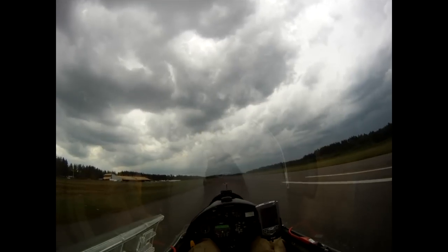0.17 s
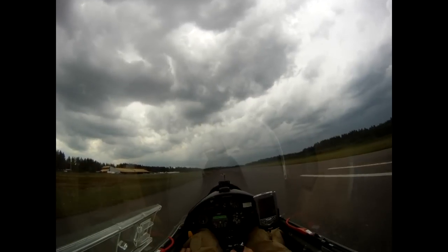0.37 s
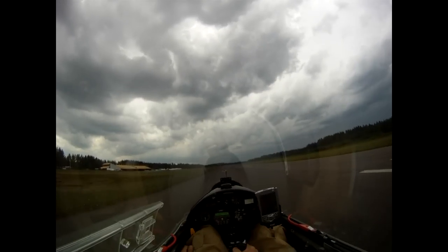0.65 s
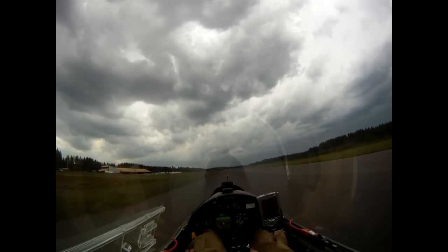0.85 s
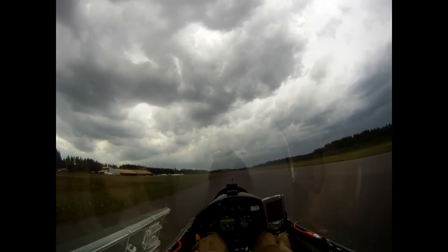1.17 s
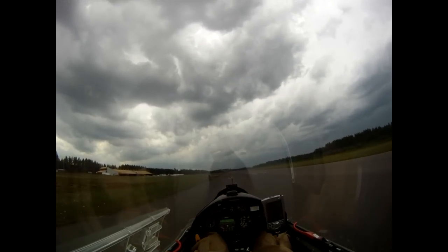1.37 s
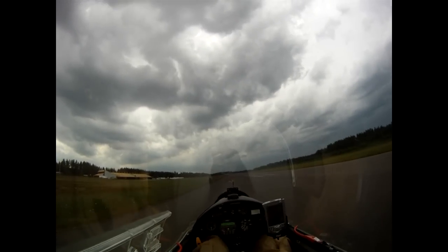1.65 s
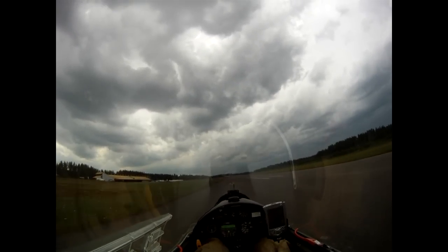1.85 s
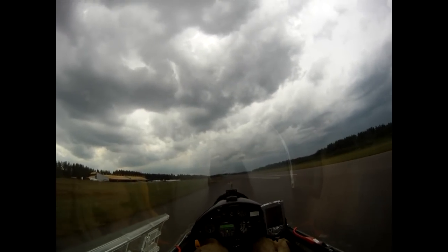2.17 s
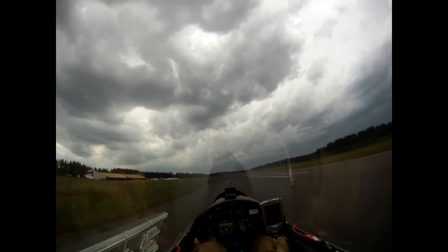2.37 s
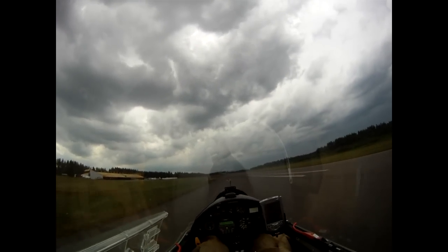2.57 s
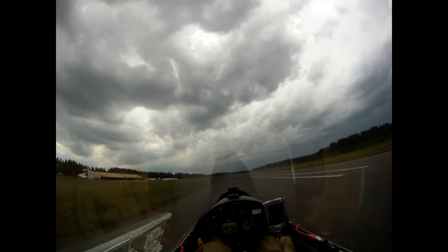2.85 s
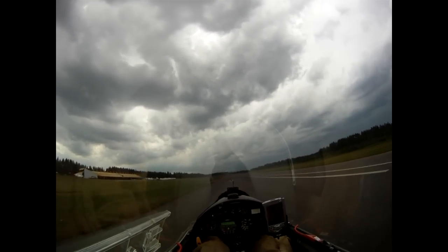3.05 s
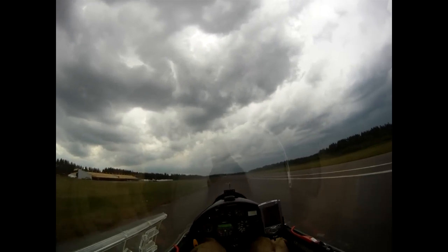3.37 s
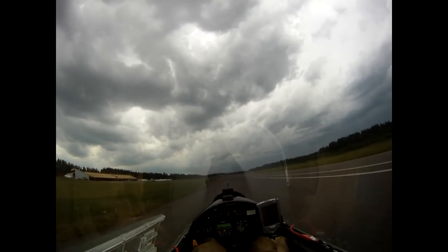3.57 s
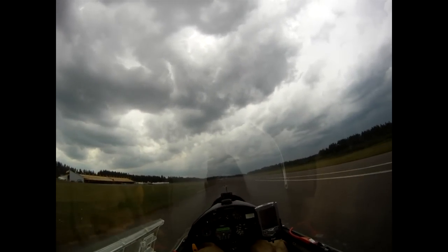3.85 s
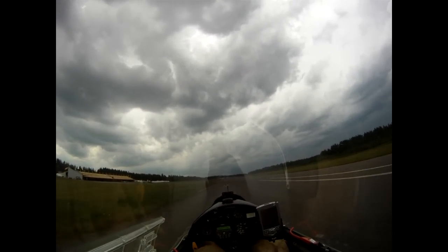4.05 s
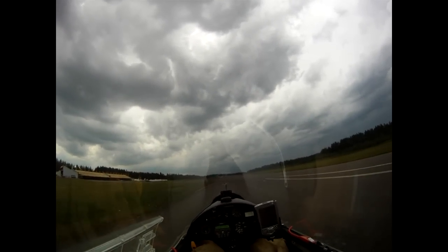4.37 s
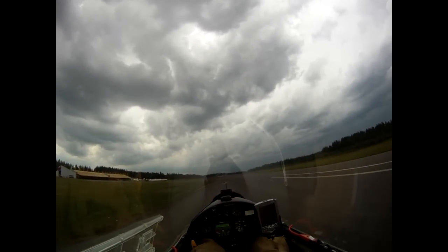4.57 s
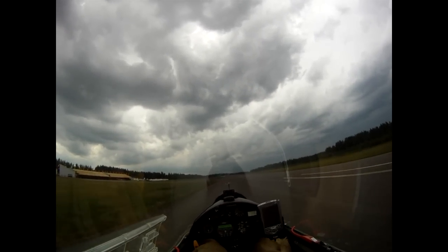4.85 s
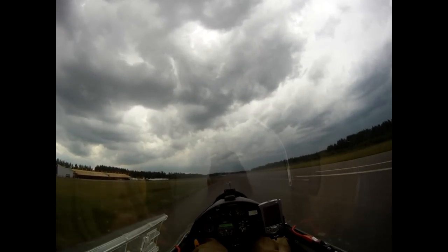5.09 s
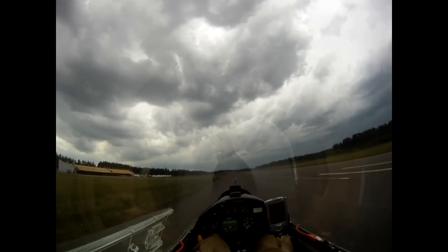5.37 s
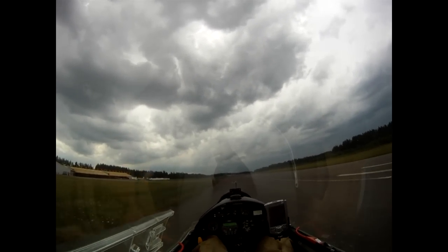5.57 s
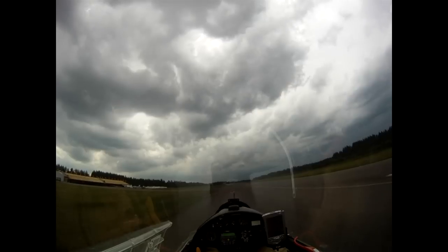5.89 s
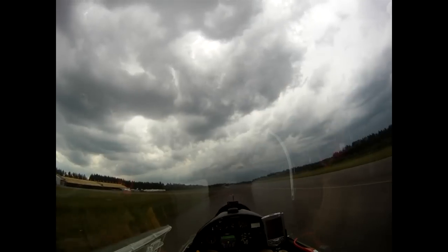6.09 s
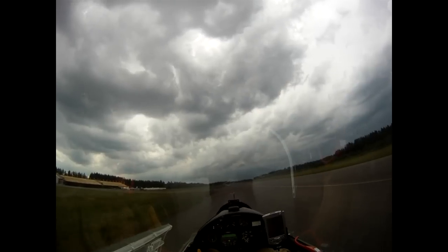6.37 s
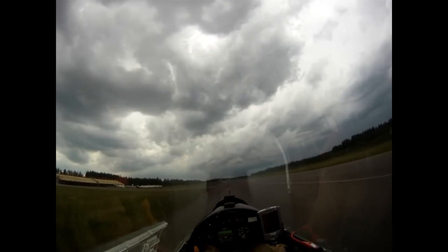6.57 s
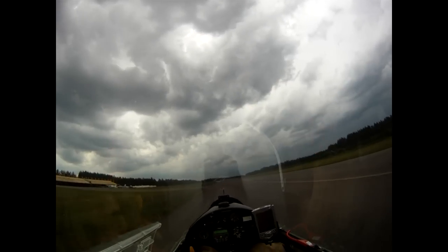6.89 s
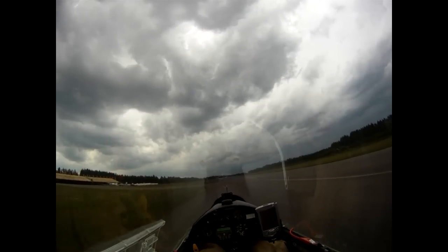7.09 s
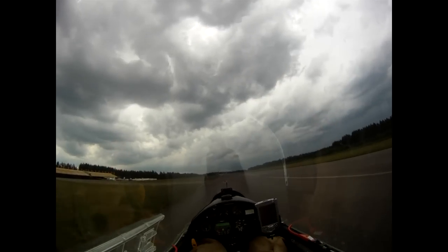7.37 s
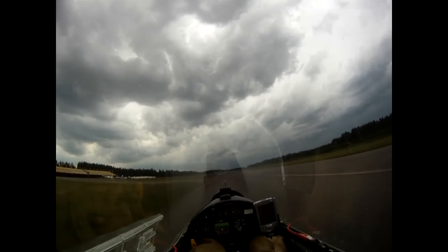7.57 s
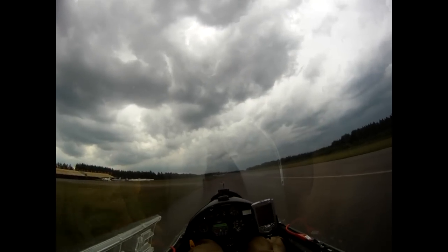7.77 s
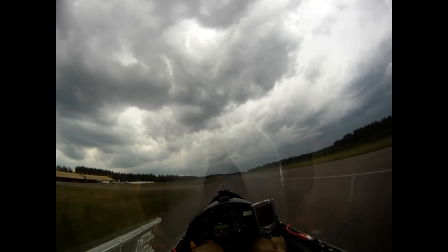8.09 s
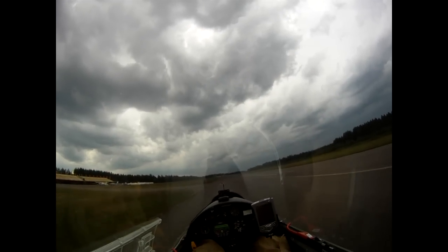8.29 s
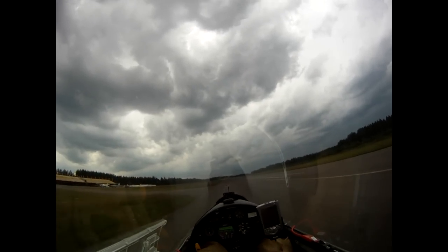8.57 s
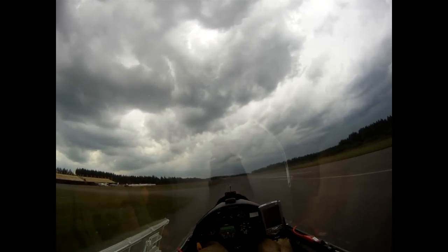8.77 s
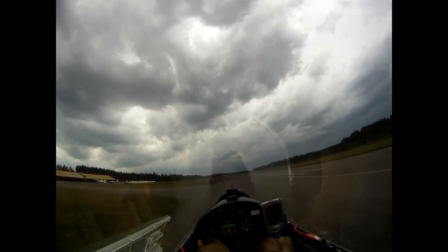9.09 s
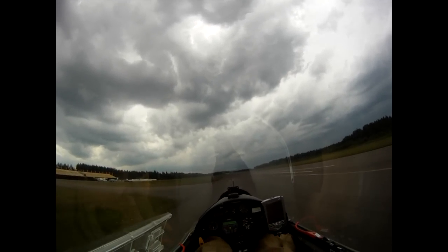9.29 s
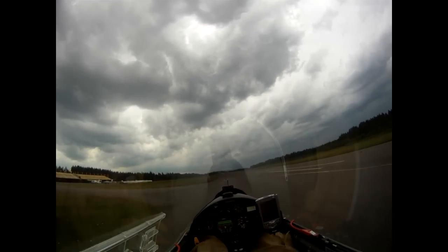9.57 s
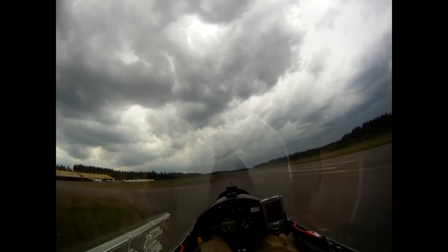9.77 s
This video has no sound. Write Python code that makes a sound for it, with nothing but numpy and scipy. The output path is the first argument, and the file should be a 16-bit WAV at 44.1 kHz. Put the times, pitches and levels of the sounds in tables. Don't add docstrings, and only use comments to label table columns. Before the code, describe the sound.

Low throbbing hum and roar of a glider rolling along a runway, wind hiss, clattering bursts of cabin rattles, and small metallic buckle chinks.

```python
import sys
import numpy as np
from scipy import signal
from scipy.fft import rfft, irfft, next_fast_len
from scipy.io import wavfile
from scipy.ndimage import uniform_filter1d, map_coordinates

SR = 44100
rng = np.random.default_rng(int(sys.argv[2]) if len(sys.argv) > 2 else 0)


def wav_out(sig):
    wavfile.write(sys.argv[1], SR, np.round(np.clip(np.atleast_2d(sig).T, -1, 1) * 32767).astype(np.int16))


def gain_from_decibels(decibels):
    exponent = np.asarray(decibels, float) / 20
    return 10 ** exponent


N = 438354

# order [multiple of the turn rate], level/dB
TYRE_HARMONICS = [
    [(2, 4), (3, 4), (4, -4)],
    [(5, 0.5)],
    [(6, -1), (7, -6), (8, -4.5), (9, -2.5), (10, -0.5), (12, -3.5)],
]
# level/dB at full speed, growth [dB per dB of speed], gain under drag/dB
TYRE_FORCING = [
    (-51, .1, 10),
    (-32.5, 2, 0),
    (-47, 0.19, 6),
]
# f/Hz, bandwidth/Hz, level/dB
HULL_BOOM = [(28.4, 11, -9.5), (59.6, 22, -5.5), (100, 26, -1), (137.5, 22.8, -3), (174.8, 30.7, -5)]
# f/Hz, bandwidth/Hz, level/dB
HULL_DRONE = [(222.7, 25.4, -6), (295.7, 20.7, 1.5)]
# f/Hz, bandwidth/Hz, level/dB
HULL_SHELL = [(350.3, 13, -5.5), (431.8, 44.3, -3), (521.4, 59, -3), (604.7, 56.5, -1.5), (694, 37, -1.5),
              (805, 130, -9)]
# level/dB at full speed, growth [dB per dB of speed], swell depth/dB
ROAD_FORCING = [
    (-29.5, -.3, 0.4),
    (-29.5, -0.019, 1),
    (-37, 0.34, 0.23),
]
# f/Hz, level/dB
AIR_SPECTRUM = [(530, -21), (900, -3.5), (1080, -7.5), (1210, -6.5), (1490, -14), (2160, -13), (2600, -20),
                (2980, -14.5), (3540, -24), (5200, -32), (5900, -38), (7670, -74), (13000, -120)]
# t/s, level/dB
AIRFRAME_SHAKE = [(0.0, -60), (0.52, -64.5), (1.57, -62.5), (1.71, -63), (2.05, -61.5), (3.1, -61),
                  (3.43, -62.5), (4.07, -62), (4.54, -64), (5.42, -60), (5.76, -65), (6.23, -60.5),
                  (7.94, -64), (8.72, -59.5), (9.0, -63.5), (9.94, -60)]
# t/s, peak level/dB, hardness [0-1], weight/dB
JUDDER_KNOCKS = [(2.2473, -43, .15, 9), (2.385, -36.5, 0.4, 9), (2.4284, -37, 0.5, 6.5),
                 (2.5007, -45, 0.3, 14), (2.5262, -48.5, .25, 9), (2.5391, -35, .5, 5.5),
                 (2.5934, -47.5, 0.3, 7), (2.6256, -34.5, 0.3, 7), (2.7062, -46.5, .05, 19.5),
                 (2.7427, -33, .55, 3), (2.8449, -41, .35, 7), (2.8918, -41.5, .4, 9),
                 (2.9612, -42, 0.8, -4), (2.9921, -33.5, .4, -2), (3.036, -42, 0.2, 9),
                 (3.0726, -37, .4, 7), (3.0989, -42, 0.4, 7), (3.1123, -53, 0.3, -2),
                 (3.1427, -39, 0.4, 11), (3.2044, -35.5, .4, 6.5), (3.35, -44.5, 0.1, 11),
                 (3.7953, -44, .15, 16.5), (3.933, -40, .55, 11), (3.9466, -42.5, .75, -8),
                 (3.9913, -43.5, 0.6, 10.5), (4.041, -31, 0.6, 4), (4.1056, -37.5, .4, 5.5),
                 (4.1894, -34, 0.5, 4), (4.2773, -44.5, .35, 11.5), (4.3066, -37.5, .48, 11.5)]
# t/s, peak level/dB, hardness [-0.1 to 1], weight/dB
BUMP_KNOCKS = [(.0164, -51, 0.4, 18), (.177, -46, 0.3, 17), (.4438, -52, 0.1, 24.5), (.621, -41, .2, 15),
               (.8895, -39.5, .2, 13), (1.0874, -43, 0.6, 8.5), (1.1379, -45.5, 0.4, 20.5),
               (1.5249, -51.5, 0.2, 17), (1.6043, -51, .15, 13), (1.701, -46.5, 0.2, -7),
               (1.8093, -45, .55, 16), (1.8367, -51.5, -.1, 8), (1.8921, -47, -.1, 12.5),
               (1.9328, -40, 0.2, 6.5), (5.216, -46, 0.2, 16), (5.3986, -34.5, .48, 5),
               (6.1933, -42.5, 0.7, -9), (6.2696, -46.5, 0.4, 15.5), (6.4587, -42, 0.9, 0),
               (6.569, -43.5, .6, 11.5), (7.1866, -43.5, .15, 11), (7.2699, -37.5, 0.5, 1),
               (8.1224, -38.5, 0.21, 11), (8.3365, -43.5, 0.4, 16), (8.4342, -38, 0.7, 8),
               (8.7994, -38.5, 0.8, 3), (8.8498, -54, 0.1, 18), (8.9531, -45.5, 0.5, 10),
               (9.6178, -48, 0.8, 11), (9.6954, -44.5, 1, -5.5)]
# t/s, peak level/dB
PANEL_TAPS = [(.3123, -55), (.364, -56), (.915, -44.5), (1.9058, -47.5), (1.96, -45), (2.553, -43),
              (2.815, -58), (3.2504, -49), (3.272, -49.5), (3.5492, -47.5), (3.579, -55.5), (3.6177, -56.5),
              (3.6868, -51.5), (3.8763, -49.5), (4.35, -52), (4.944, -64), (5.3077, -50.5), (5.72, -53.5),
              (6.3279, -51), (6.983, -48.5), (1.225, -49.5), (1.44, -55.5), (8.145, -48), (7.1242, -54.5),
              (8.9314, -49.5), (9.184, -52), (9.338, -50.5)]
# level over its ring/dB, hardness [0-1], weight/dB
BUCKLE_BLOW = (3.3, 0.82, -2)
# f/Hz, bandwidth/Hz, level/dB
HULL_THUMP = [(562, 79, 2), (678, 174, -4.5)]
# f/Hz, bandwidth/Hz, level/dB
PANEL_MODES = [(950, 470, -4), (1267, 160, 5), (1580, 710, -11)]
# f/Hz, bandwidth/Hz, level/dB
FITTING_MODES = [(1770, 600, -7), (2250, 320, -2.5), (2500, 230, -1), (2820, 260, -0.5), (3270, 650, -8)]
# f/Hz, bandwidth/Hz, level/dB
BRIGHT_MODES = [(3820, 260, 1.5), (4170, 520, -5.5), (5100, 500, -13.5)]
# t/s, peak level/dB
TRIM_TICKS = [(.8071, -65), (.8659, -66), (1.5738, -57.5), (1.6322, -56), (1.9096, -54), (1.955, -59.5),
              (2.3241, -63.5), (2.4658, -64), (2.7282, -57.5), (4.4842, -61.5), (4.9162, -62.5),
              (5.037, -68), (5.3088, -62), (5.435, -49.5), (5.9614, -63), (6.205, -58), (5.81, -64),
              (6.7241, -59.5), (6.9506, -59.5), (7.1242, -61.5), (7.434, -63), (8.5834, -59), (9.3357, -61),
              (9.4674, -61), (9.7672, -64)]
# t/s, peak level/dB
BUCKLE_CHINKS = [(5.4759, -41.5), (5.5073, -49), (7.5042, -44.5), (7.5606, -42.5), (7.6929, -50),
                 (7.7298, -50.5), (7.8455, -47), (7.9767, -40.5), (8.029, -45), (8.3025, -50)]
# f/Hz, level/dB, time to decay by 85 dB/s
BUCKLE_MODES = [(2270, 1.5, 0.19), (2150, -11, .12), (2650, -10.5, 0.14), (2990, -0.5, 0.29),
                (2880, -8, 0.34), (3440, -11, 0.15), (4130, -12, 0.39), (4510, -9.5, .08)]
# t/s, length/s, level/dB, brightness [0-1]
STRAP_STROKES = [
    (6.05, .1, -65, .7),
    (6.1, .065, -63, .1),
    (6.14, .07, -64.5, .9),
    (8.691, .09, -66, .4),
]
# f/Hz, bandwidth/Hz, level/dB
STRAP_MODES = [(1600, 900, -5.5), (2430, 830, -6.5), (3600, 270, 4.5), (4280, 660, -6), (5070, 450, -4.5)]

COAST_HZ, BRAKE_S, SLOWING_HZ_PER_S = 14.85, 1.8, 1.125
DRAG_ON_S, DRAG_OFF_S, DRAG_FADE_S = 2.1, 6.9, .3
AIR_DB = 2.5
CHATTER_DB, CHATTER_GROWS = -47, .8
TAP_HARDNESS, TAP_WEIGHT_DB = 0.22, 10
KNOCK_T60_S, PANEL_DB, PANEL_LOSS_DB, BRIGHT_DB, BRIGHT_GAIN_DB = 0.085, 16.5, 21, -16, 14
SNAP_DB, SNAP_GAIN_DB = -35.5, 14.5
FAINT_TICK_DB, FAINT_SPREAD_DB = -71, 7
SETTLE_DB, SETTLE_S = 3, 0.028
CLOSE_S = .004


def unit(x):
    return x / np.sqrt(np.mean(x ** 2) + 1e-20)


def curves(rows):
    s, *cols = np.transpose(rows)
    return [np.interp(np.arange(N) / SR, s, c) for c in cols]


def wobble(rate):
    knots = rng.standard_normal(int(N * rate / SR) + 4)
    return map_coordinates(knots, [np.arange(N) * rate / SR])


def filtered(x, response):
    m = next_fast_len(len(x) + 8192)
    return irfft(rfft(x, m) * response(np.fft.rfftfreq(m, 1 / SR)), m)[:len(x)]


def modes(table, top_hz, order):
    def response(f):
        total = 0
        for k, (centre, width, db) in enumerate(table):
            resonance = 1j * f * width / (centre * centre - f * f + 1j * f * width)
            total = total + (-1) ** k * gain_from_decibels(db) * resonance
        return total / (1 + 1j * f / top_hz) ** order
    return response


def patchy(depth_db):
    z = signal.stft(rng.standard_normal(N), nperseg=512)[2]
    field = uniform_filter1d(rng.standard_normal(z.shape), size=6, axis=0)
    field = uniform_filter1d(field, size=8, axis=1)
    return signal.istft(z * gain_from_decibels(depth_db * unit(field)), nperseg=512)[1][:N]


def wheel():
    return COAST_HZ - SLOWING_HZ_PER_S * np.maximum(np.arange(N) / SR - BRAKE_S, 0)


def speed_db():
    return 20 * np.log10(wheel() / COAST_HZ)


def tyre():
    t = np.arange(N) / SR
    angle = 2 * np.pi * np.cumsum(wheel()) / SR
    drag = (np.tanh((t - DRAG_ON_S) / DRAG_FADE_S) - np.tanh((t - DRAG_OFF_S) / DRAG_FADE_S)) / 2
    wavers_db = (1.5, .4, 2.5)
    out = np.zeros(N)
    for (level_db, grows, drag_db), pattern, waver_db in zip(TYRE_FORCING, TYRE_HARMONICS, wavers_db):
        level = gain_from_decibels(level_db + 2 + grows * speed_db() + drag_db * drag)
        for k, db in pattern:
            out += level * gain_from_decibels(db + waver_db * wobble(4.0)) * np.sin(k * angle + k * k)
    return out


def roar(bumps):
    out = np.zeros(N)
    bodies = (HULL_BOOM, HULL_DRONE, HULL_SHELL)
    for (level_db, grows, swell_db), body, bump_db in zip(ROAD_FORCING, bodies, (.8, .9, 1.8)):
        ring = filtered(rng.standard_normal(N), modes(body, 590, order=6))
        swell = gain_from_decibels(bump_db * bumps + 0.92 * wobble(30) + swell_db * wobble(7))
        out += gain_from_decibels(level_db + grows * speed_db()) * unit(swell * ring)
    return out


def air(bumps):
    hz, db = np.transpose(AIR_SPECTRUM)
    grit = gain_from_decibels(0.96 * bumps + 1.8 * wobble(60) + 1.9 * wobble(300))

    def colour(f):
        return gain_from_decibels(np.interp(np.log(f + 1), np.log(hz), db))

    hiss = unit(filtered(grit * patchy(depth_db=2.2), colour))
    return gain_from_decibels(curves(AIRFRAME_SHAKE)[0] + AIR_DB) * hiss


def knocks(count):
    over_db, hard, weight_db = BUCKLE_BLOW
    buckle_blows = [(s, db + over_db, hard, weight_db) for s, db in BUCKLE_CHINKS]
    taps = [(s, db, TAP_HARDNESS, TAP_WEIGHT_DB) for s, db in PANEL_TAPS]
    shake_db = curves(AIRFRAME_SHAKE)[0]
    s, a, b, c = rng.uniform(size=(count, 4)).T
    at = (s * (N - 1)).astype(int)
    chatter_db = CHATTER_DB + CHATTER_GROWS * (shake_db[at] - shake_db.mean()) - 8 * a
    chatter = np.c_[at / SR, chatter_db, .6 * b, 16 * c]
    return np.r_[JUDDER_KNOCKS, BUMP_KNOCKS, buckle_blows, taps, chatter]


def rattle(blows):
    t = np.arange(SR // 8) / SR
    drive = np.zeros((4, N + SR))
    for s, db, hard, weight_db in blows:
        decay_s = KNOCK_T60_S * rng.uniform(.75, 1.3)
        shake = gain_from_decibels(-60 * t / decay_s) * (1 - np.exp(-t / 0.00067))
        bounce = 0.67 * np.exp(-((t - rng.uniform(.009, 0.01)) / 0.0026) ** 2)
        blow = 1 + 1.36 * gain_from_decibels(-60 * t / .016) + bounce
        panel_db = PANEL_DB - PANEL_LOSS_DB * hard
        bright_db = BRIGHT_DB + BRIGHT_GAIN_DB * hard
        levels = db + np.array([[weight_db + 21.5], [panel_db], [5], [bright_db]])
        drive[:, round(s * SR):][:, :len(t)] += gain_from_decibels(levels) * shake * blow * rng.standard_normal(len(t))
    bodies = (HULL_THUMP, PANEL_MODES, FITTING_MODES, BRIGHT_MODES)
    tops_hz = (1180, 2340, 5100, 7060)
    return sum(filtered(d[:N], modes(body, top, order=4)) for d, body, top in zip(drive, bodies, tops_hz))


def ticks(blows, count):
    t = np.arange(SR // 100) / SR
    snaps = np.zeros(N + SR)
    faint = [(s * N / SR, FAINT_TICK_DB + FAINT_SPREAD_DB * u) for s, u in rng.uniform(size=(count, 2))]
    with_knocks = [(s, db + SNAP_DB + SNAP_GAIN_DB * hard) for s, db, hard, _ in blows]
    for s, db in TRIM_TICKS + faint + with_knocks:
        snaps[round(s * SR):][:len(t)] += gain_from_decibels(db + 22.5 - 60 * t / 0.0061) * rng.standard_normal(len(t))
    return filtered(snaps[:N], modes([(4500, 1500, 0)], 5700, order=4))


def buckle():
    t = np.arange(SR // 5) / SR
    steel = np.zeros(N + SR)
    for s, db in BUCKLE_CHINKS:
        jostle = np.cumsum(rng.standard_normal((len(BUCKLE_MODES), len(t))), axis=1) * .12
        strengths_db = rng.normal(0, 2.5, len(BUCKLE_MODES))
        ring = np.zeros(len(t))
        for (hz, level, decay_s), phase, strength_db in zip(BUCKLE_MODES, jostle, strengths_db):
            decay = gain_from_decibels(level + strength_db - 85 * t / decay_s)
            ring += decay * np.sin(2 * np.pi * hz * t + phase)
        steel[round(s * SR):][:len(t)] += gain_from_decibels(db - 10) * ring * (1 - np.exp(-t / .001))
    return steel[:N]


def scrape():
    t = np.arange(N) / SR
    out = np.zeros(N)
    for body, high in ((STRAP_MODES[:3], 0), (STRAP_MODES[3:], 1)):
        stroke = np.zeros(N)
        for s, length, db, bright in STRAP_STROKES:
            share = abs(1 - high - bright)
            stroke += gain_from_decibels(db) * share * np.sin(np.pi * np.clip((t - s) / length, 0, 1))
        friction = unit(filtered(rng.standard_normal(N), modes(body, 9000, order=2)))
        out += stroke * gain_from_decibels(2.1 * wobble(80)) * friction
    return out


def scene():
    bumps = wobble(16)
    blows = knocks(count=30)
    rolling = tyre() + roar(bumps) + air(bumps)
    loose_parts = ticks(blows, count=110) + rattle(blows) + buckle() + scrape()
    return (rolling + loose_parts)[None]


def top_cut(x):
    return signal.sosfilt(signal.butter(12, 15600, fs=SR, output="sos"), x)


def record(dry):
    t = np.arange(N) / SR
    x = filtered(dry[0], lambda f: (1j * f / (19 + 1j * f)) ** 3)
    x = x * gain_from_decibels(SETTLE_DB * np.exp(-t / SETTLE_S))
    x = x / (1 + np.abs(x / .232) ** 14) ** (1 / 14)
    low = signal.resample_poly(np.pad(x, (0, 441), "reflect"), 40, 147)
    held = signal.resample_poly(np.repeat(low, 4), 147, 160)[:N]
    closing = np.minimum(t[::-1] / CLOSE_S, 1)
    return top_cut((held * closing)[None])


dry = scene()
out = record(dry)
wav_out(out)
```